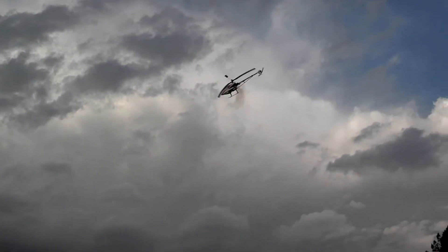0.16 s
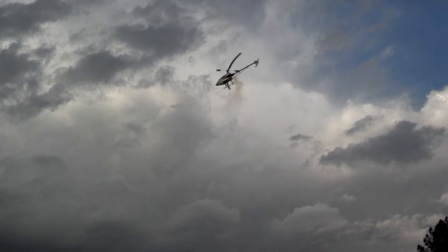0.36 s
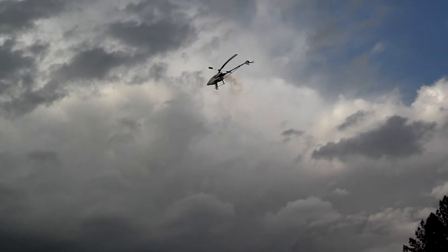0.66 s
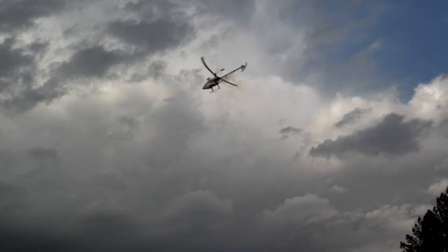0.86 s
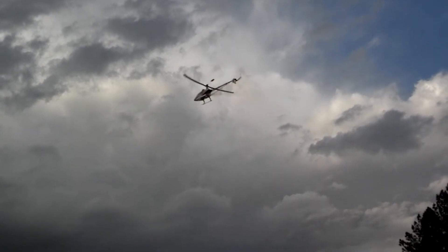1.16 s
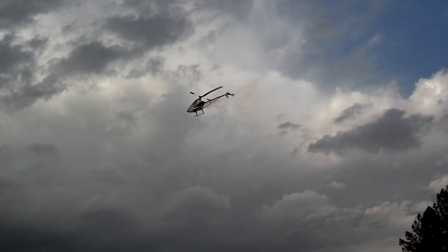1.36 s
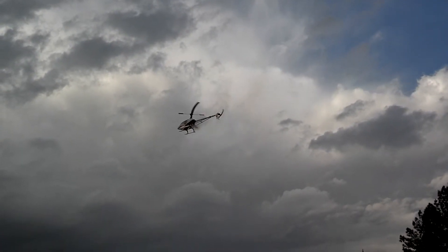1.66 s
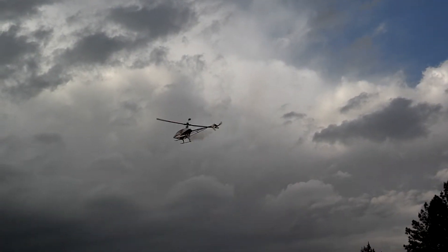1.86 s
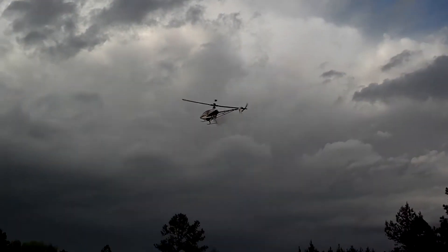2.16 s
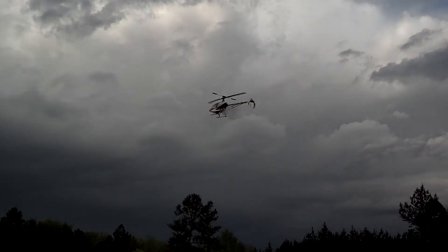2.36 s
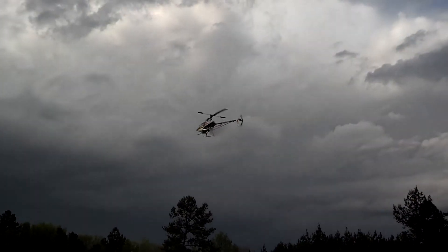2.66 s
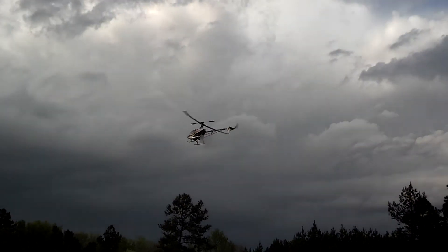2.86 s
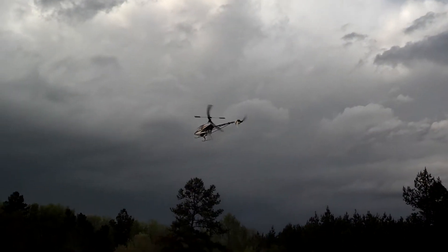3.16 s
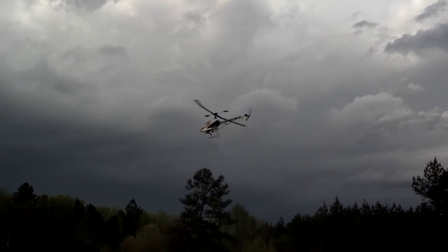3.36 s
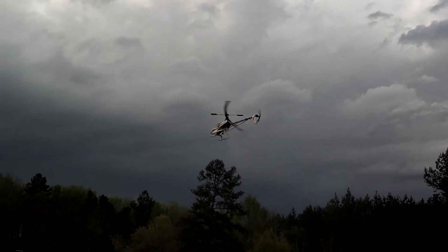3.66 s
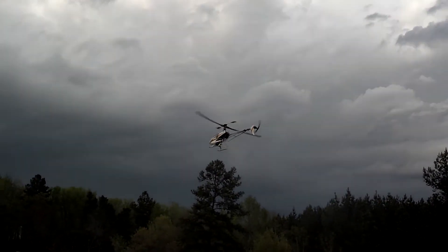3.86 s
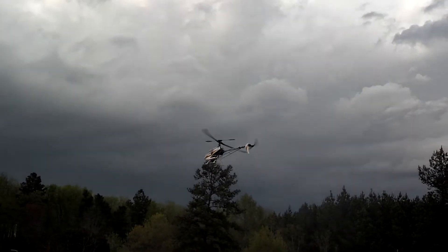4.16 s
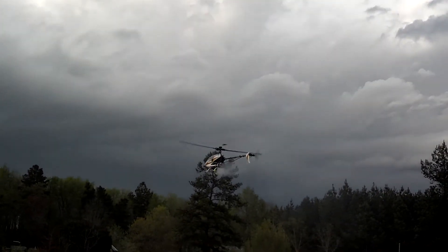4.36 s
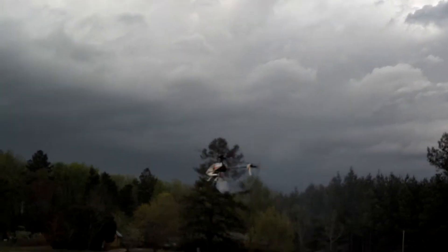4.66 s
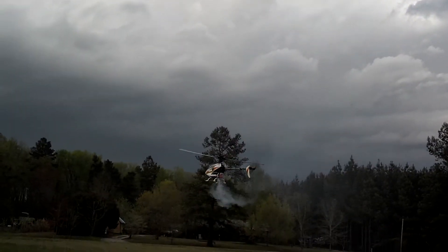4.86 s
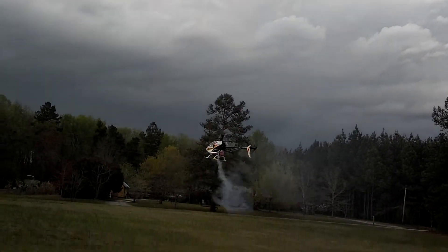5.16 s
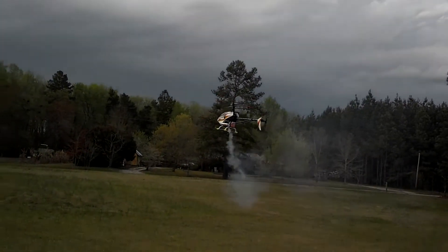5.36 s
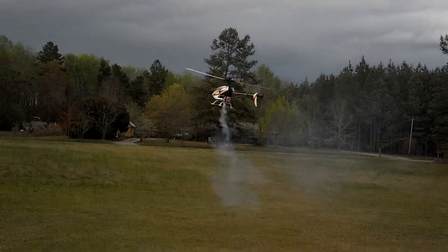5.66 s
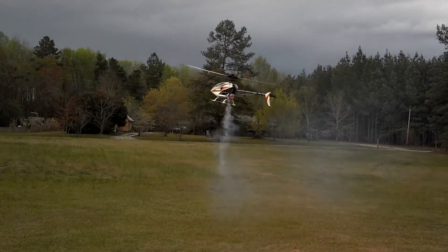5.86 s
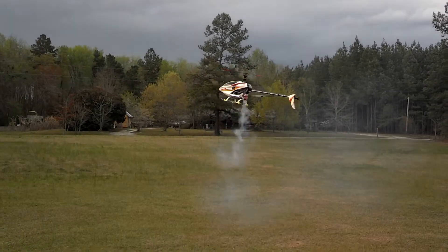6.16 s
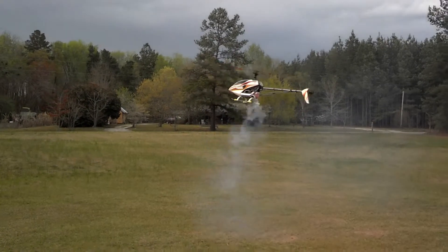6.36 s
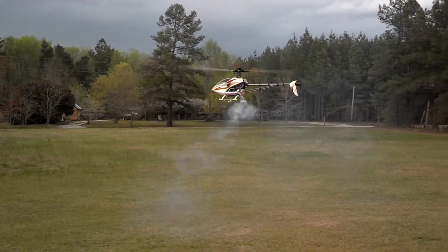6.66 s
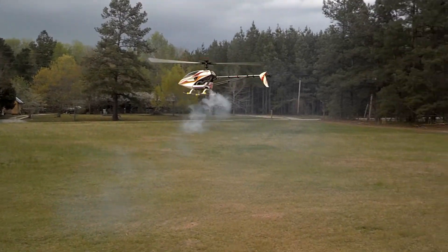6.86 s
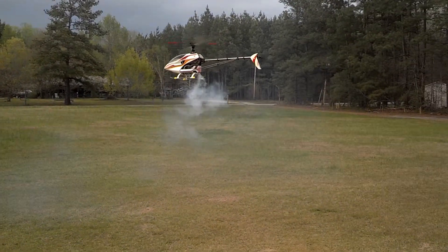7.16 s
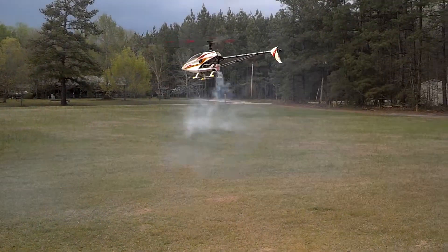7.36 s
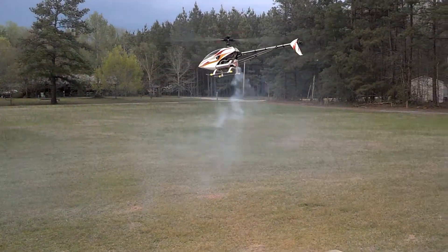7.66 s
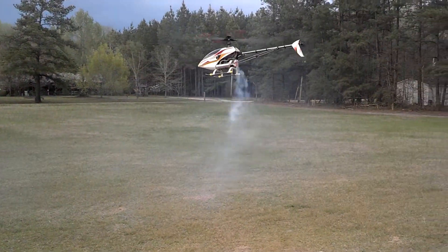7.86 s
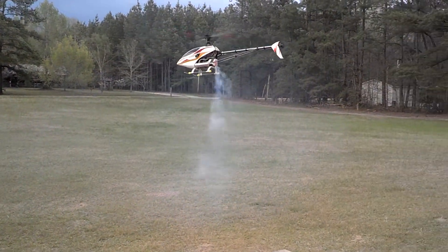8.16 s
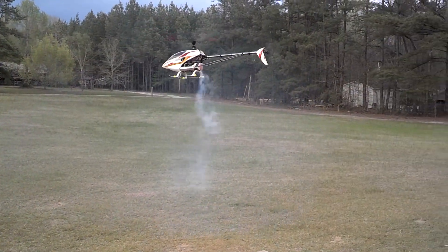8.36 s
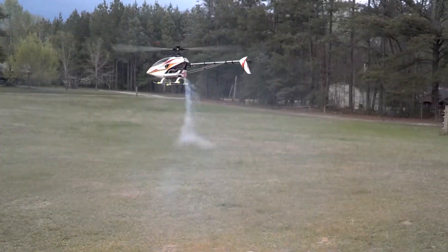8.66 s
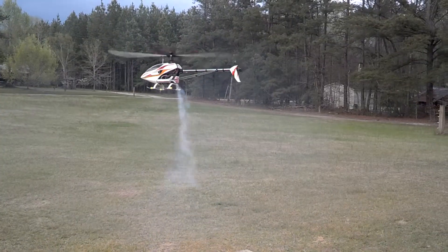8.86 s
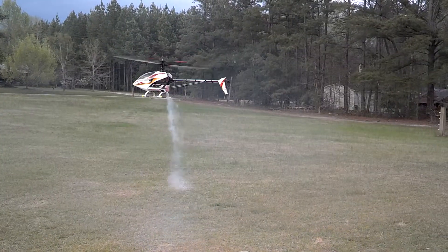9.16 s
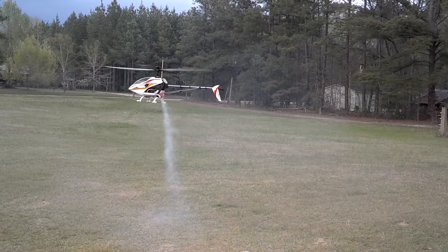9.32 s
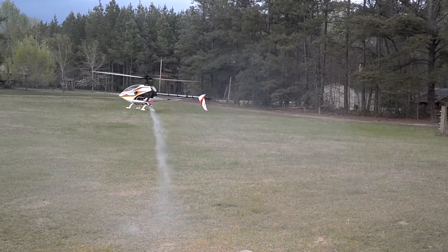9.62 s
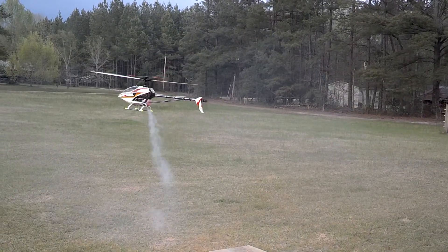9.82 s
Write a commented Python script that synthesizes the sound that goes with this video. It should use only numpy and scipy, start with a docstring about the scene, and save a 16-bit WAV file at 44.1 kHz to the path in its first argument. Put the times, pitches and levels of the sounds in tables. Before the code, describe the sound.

A glow-engine model helicopter buzzes steadily with a raspy, nasal whine and hissing exhaust, stumbling briefly early on, then hovering over an open field.

```python
"""A glow-engine model helicopter starts overhead, its engine stumbling three times in the first seconds.
It sinks to a hover above grass, turning side-on; the ground echo arrives sooner, so a comb sweeps bass and middle.
Exhaust partials, cracks, puffed hiss, gear tones and blade wash all follow one shaft, as a governor hunts in speed.
From five seconds in, soft buffets of breeze come and go; near the end the machine sinks again.
Faint scatter from trees lies behind it all, and a stereo widener spreads the picture."""
import sys
import numpy as np
from scipy import signal
from scipy.fft import rfft, irfft
from scipy.io import wavfile
from scipy.ndimage import uniform_filter1d

SR = 44100
rng = np.random.default_rng(int(sys.argv[2]) if len(sys.argv) > 2 else 0)


def dump_mix(stems):
    """Bounce the given channels to the path in sys.argv[1] as a 16-bit WAV at rate SR."""
    frames = np.atleast_2d(stems).T  # one column per channel
    limited = np.clip(frames, -1, 1)  # hard clip at full scale
    pcm = np.round(limited * 32767).astype(np.int16)
    wavfile.write(sys.argv[1], SR, pcm)


N = 440550
TIME = np.arange(N) / SR  # seconds
FREQ = np.fft.rfftfreq(N, 1 / SR)  # Hz

# In the tables, under, front and side are the parts of the machine that face the listener.
# Engine speed, as the governor hunts round its set speed: time_s, firings_per_s
FIRING_RATE = [(0.0, 103.58), (0.09, 102.91), (0.18, 103.53), (0.26, 102.93), (0.39, 103.69), (0.5, 102.81),
               (0.66, 104.11), (0.83, 103.19), (0.9, 103.65), (1.08, 103.36), (1.32, 104.17),
               (1.47, 103.53), (1.68, 104.47), (1.79, 103.58), (2.01, 104.56), (2.32, 103.5), (2.5, 104.31),
               (2.68, 103.58), (2.83, 104.2), (3.03, 103.26), (3.17, 103.99), (3.31, 102.98),
               (3.49, 103.46), (3.61, 102.91), (3.71, 104.0), (3.84, 103.43), (4.02, 103.7), (4.11, 102.97),
               (4.24, 103.76), (4.34, 103.21), (4.54, 104.28), (4.67, 103.24), (4.92, 104.63),
               (5.09, 103.04), (5.21, 104.39), (5.47, 103.36), (5.73, 104.47), (5.94, 103.73),
               (6.03, 104.25), (6.12, 103.99), (6.2, 104.49), (6.39, 103.47), (6.58, 104.37),
               (6.76, 103.41), (7.0, 104.36), (7.21, 103.42), (7.31, 104.63), (7.64, 103.21),
               (7.78, 104.31), (8.02, 102.6), (8.15, 103.97), (8.32, 103.0), (8.45, 104.37), (8.62, 103.53),
               (8.7, 103.83), (8.79, 102.9), (8.91, 104.0), (9.12, 102.67), (9.32, 103.97), (9.52, 102.63),
               (9.62, 103.59), (9.72, 103.04), (9.84, 103.72), (9.92, 103.04), (9.98, 103.4)]
# The engine stumbles and carries on firing on the other turn: time_s
STUMBLES = [0.58, 1.46, 2.1]
# Delay of the ground echo, before any turf shift: time_s, lag_ms
GROUND_LAG = [(0, 5.8), (.55, 5.92), (1.2, 5.7), (1.6, 5.25), (2.1, 4.75), (2.5, 4.35), (3.1, 4.02),
              (3.9, 3.78), (4.3, 3.45), (5, 2.72), (5.4, 2.58), (6.5, 2.5), (7.6, 2.6), (8.4, 2.52),
              (9.2, 2.3), (9.99, 1.85)]
# Turn of the machine, 0 = under, 1 = front quarter, 2 = side: time_s, aspect
ASPECT = [(1.1, 0), (1.6, .45), (2.1, 1), (5.8, 1), (6.4, 1.75), (6.8, 2)]
# Exhaust harmonics, balanced before buzz and ring are levelled: firing_multiple, under_db, front_db, side_db
EXHAUST = [(1, -65.0, -57.0, -57.0), (2, -39.5, -39.5, -36), (3, -49.5, -50.0, -49.0),
           (4, -50.0, -46.5, -50.0), (5, -50.0, -58.0, -58.5), (6, -44.5, -42.5, -38.5),
           (7, -45.5, -45.5, -47.5), (8, -47.0, -40.0, -42.5), (9, -54.0, -50.5, -46.0),
           (10, -34.0, -40.0, -41.5), (11, -43.0, -37.5, -39.5), (12, -41.0, -36.5, -38.5),
           (13, -35.5, -37.0, -37.0), (14, -42.5, -37.0, -36.0), (15, -36.0, -32.0, -36.5),
           (16, -44.0, -32.0, -35.0), (17, -46.0, -40.0, -49.5), (18, -30.5, -40.0, -38.0),
           (19, -42.5, -45.5, -43.0), (20, -36.5, -44.0, -32.0), (21, -52.5, -45.5, -47.5),
           (22, -45.5, -43.5, -41.0), (23, -53.5, -49.0, -49.5), (24, -47.5, -46.5, -42.5),
           (25, -56.5, -47.5, -50.0), (26, -60.0, -49.5, -49.0), (27, -51.5, -52.0, -49.0),
           (28, -61.5, -59.5, -55.5), (29, -56.5, -49.5, -58.5), (30, -59.0, -52.5, -60.5),
           (31, -60.0, -56.0, -51.0), (32, -60.0, -63.0, -61.0), (33, -63.0, -52.5, -49.5),
           (34, -52.0, -59.5, -48.5), (35, -50.5, -51.0, -45.5), (36, -55.5, -45.0, -51.0),
           (37, -56.0, -54.0, -51.0), (38, -52.0, -55.0, -54.0)]
# Phase scatter of the exhaust pulse, cleanest ahead of the muffler: under_rad, front_rad, side_rad
PHASE_SCATTER = (1.35, 0.9, 1.6)
# Muffler buzz, before the governor's surges: time_s, level_db
BUZZ_LEVEL = [(0.0, -33.5), (0.89, -33.5), (2.37, -29.5), (2.66, -27.5), (2.88, -32.5), (4.0, -27.5),
              (4.38, -32.5), (4.83, -28), (5.04, -30.5), (5.7, -25.5), (6.16, -30.5), (6.41, -26.5),
              (7.11, -31.5), (7.36, -28), (7.53, -32.5), (8.66, -29), (9.24, -37), (9.99, -29)]
# The pipe's higher ring, before its trim and the surges: time_s, level_db
RING_LEVEL = [(0.0, -25), (0.67, -25), (1.21, -34), (1.5, -27), (2.17, -30), (4.59, -32), (5.78, -30),
              (6.37, -28), (7.45, -32.5), (8.61, -29.5), (9.03, -36), (9.99, -25.5)]
# Sharp edge of each exhaust pulse, a filter gain: pitch_hz, under_db, front_db, side_db
CRACK_COLOUR = [(3340, -55, -50, -43), (4320, -30, -31, -7), (4570, -25, -9.5, -23), (6760, -24, -56, -23),
                (12000, -36, -39, -40)]
# Rotor hum and gear whine, before a shared gain: rotor_speed_multiple, under_db, front_db, side_db
DRIVE_TONES = [(6.03, -63, -61, -62), (6.91, -62.5, -59.5, -58), (7.94, -58, -60, -62),
               (10.993, -44.5, -47, -47), (12.91, -71, -60, -56), (78.7, -69, -48.5, -56),
               (79.8, -68, -53, -52), (83.6, -70, -51, -39), (85.2, -47, -58, -37.5), (88.7, -46, -48, -42)]
# Hiss with rattle, before the surges: time_s, level_db
HISS_LEVEL = [(0, -31), (.95, -32.5), (1.1, -34), (1.3, -31.5), (1.7, -31.5), (2.4, -31), (2.75, -31),
              (2.95, -31.5), (4.15, -31), (4.35, -33.5), (4.75, -32), (4.93, -31.5), (5.1, -31.5),
              (5.9, -31), (6.1, -30.5), (6.6, -30), (7.6, -31), (8.5, -29), (8.95, -29.5), (9.2, -32),
              (9.4, -31), (9.99, -29)]
# Relative spectrum of the hiss: pitch_hz, under_db, front_db, side_db
HISS_COLOUR = [(100, -50, -50, -50), (1500, -20, -20, -20), (2300, 2, 2, 3), (2800, 2, 0, 1),
               (3300, 0, -1, 0), (3650, 3, 1, 2), (4300, 3, -1, 0), (5250, -1, -5, -3), (5600, 2, -2, 1),
               (6050, 3, 1, -1), (6450, 1, -1, 0), (6850, -4, -5, 0), (7500, -1, -1, -1),
               (8300, -11, -3, -6), (8900, -3, -4, -2), (9900, -4, -2, -2), (10650, -1, 0, 1),
               (11350, -4, -1, -1), (12650, -1, -1, -2), (14300, 3, 1, 2), (15600, -1, 0, 1),
               (16300, -10, -10, -10)]
# Metal parts rung by each firing, balanced against the gas: pitch_hz, width_hz, under_db, front_db, side_db
RATTLE_PARTS = [(6610, 100, -51, -11.5, -51), (6740, 580, -24, -55, -7.5), (9700, 750, -19, -13, -38),
                (11160, 83, -44, -12, -10), (11750, 430, -10, -57, -9), (15000, 650, -12, -16, -8)]
# Relative spectrum of the blade wash: pitch_hz, under_db, front_db, side_db
WASH_COLOUR = [(30, -37, -33, -39), (75, -21.5, -26, -20.5), (130, -4, -14, -20), (200, -10, -8.5, -6),
               (320, 0, -2.5, -6), (523, 0, -1.5, 0.5), (840, -3, 0, -1.5), (1053, 7.5, 3, 4),
               (1550, 4.5, 5, 3.5), (1950, 8.5, 3.5, 9), (2340, -10.5, 0.5, -1.5), (2430, -40, 6, -46),
               (3220, -25, -4, -22), (6000, -36, -44, -29)]
# Level of the blade wash: under_db, front_db, side_db
WASH_LEVEL = (-30.5, -32, -33)
# Breeze on the second port: centre_s, length_s, level_db
BUFFETS = [(5.09, .04, -52), (6.61, .065, -45), (6.66, .04, -45), (6.72, .05, -48), (7.794, .06, -51),
           (8.1, .035, -48)]
# Bands the stereo widener keeps out of the mid: centre_hz, half_width_hz
MID_GAPS = [(2870, 617), (5600, 460), (8200, 414), (11100, 580), (13780, 380)]
# Bands it keeps out of the side signal: centre_hz, half_width_hz
SIDE_GAPS = [(1150, 820), (4330, 700), (7100, 303), (9700, 600), (12550, 650), (15250, 250)]
# Stereo width, before the gaps: pitch_hz, side_against_mid_db
SPREAD = [(50, -3), (110, 2.5), (220, -7), (600, -9), (1300, 4.5), (1900, 4), (2600, 7), (16000, -1)]
# Stereo lean: pitch_hz, left_minus_right_db
BALANCE = [(40, -1), (120, -5), (220, -3.5), (400, 1), (1450, 0), (1700, -2), (2000, -8), (2250, -4),
           (2450, 0), (16000, 0)]

FIRINGS_PER_ROTOR_TURN = 9 / 2
JITTER_FIRINGS_PER_S, JITTER_CHANGES_PER_S = .08, 20  # uneven burning shakes the speed
SPIT_LENGTH, SPIT_FLOOR = .08, 1.05  # decay of each spit (share of a cycle), over a steady part
TREES_DB, TREES_T60_S, TREES_BAND_HZ = -23, .7, (500, 3000)
BAND_EDGE_HZ = 15930


def exhaust(cycles, sides, ring_trim_db=-5.0):
    """Firing harmonics: crank drone and octave, low orders, muffler buzz, pipe ring and rasp.

    The grass reflects bass strongly, so at hover height the echo largely cancels the drone."""
    # Half a cycle's slip turns the odd harmonics over at each stumble.
    flip = uniform_filter1d(np.cos(np.pi * np.searchsorted(STUMBLES, TIME)), size=1200)
    scatter = np.array(PHASE_SCATTER) @ sides
    partials = {}
    for k, *db in EXHAUST:
        partial = harmonic(cycles, k, facing_db(db, sides), scatter)
        partials[k] = partial * flip if k % 2 else partial

    low = sum(partials[k] for k in (1, 3, 5, 6, 7, 8, 9))
    buzz = sum(partials[k] for k in range(10, 17))
    ring = sum(partials[k] for k in range(17, 23))
    rasp = sum(partials[k] for k in range(23, 39))

    # The crank turns twice a firing, so its drone is harmonic 2.
    drone = ground(partials[2], bounce=0.8, turf_ms=-0.2)
    octave = ground(partials[4], bounce=0.4, turf_ms=0.25)
    muffler = at_level(ground(buzz, bounce=0.45), BUZZ_LEVEL, surge_db=1.0)
    pipe = amp(ring_trim_db) * at_level(ground(ring), RING_LEVEL, surge_db=1.0)
    return drone + octave + muffler + pipe + ground(low, bounce=0.39) + rasp


def harmonic(cycles, k, db, scatter, flutter_db=0.7):
    """One exhaust partial, nearly in step with the others; turbulent air makes it flutter."""
    phase = 2 * np.pi * k * cycles + scatter * rng.standard_normal()
    return amp(db + flutter_db * wander(9)) * np.cos(phase.astype(np.float32))


def crack(firings, sides):
    """The exhaust port snaps open at each firing: a sharp tick above the rasp."""
    return coloured(clicks(firings), CRACK_COLOUR, sides)


def hiss(firings, rotor, sides, flicker_db=0.82):
    """Gas spits out at each firing, with the rattle; blades chop both, and the grass returns none of it."""
    spits = puffs(firings, SPIT_LENGTH, SPIT_FLOOR, uneven_db=2)
    gas = coloured(spits * air_noise(alike=0.17), HISS_COLOUR, sides)
    chop = 1 + .13 * np.cos(2 * np.pi * 2 * rotor)  # two blades
    beat = chop * amp(flicker_db * wander(40))
    return at_level(beat * (gas + rattle(firings, sides)), HISS_LEVEL, surge_db=0.65)


def rattle(firings, sides, slop=.004, lag=.07):
    """Each firing knocks the metal parts a moment later (slop and lag in cycles); a short chatter follows."""
    out = np.zeros(N)
    cycle = firings + slop * wander(60) + 1 - lag  # the 1 keeps the count positive
    knocks = 9 * clicks(cycle)
    for hz, width, *db in RATTLE_PARTS:
        chatter = puffs(cycle, length=0.28, floor=0.21, uneven_db=1.5) * rng.standard_normal(N)
        ring = signal.lfilter(*signal.iirpeak(hz, hz / width, fs=SR), knocks + chatter)
        out += amp(facing_db(db, sides)) * ring / ring.std()
    return out


def drivetrain(rotor, sides, gain_db=2, flutter_db=1):
    """Rotor hum and gear whine, locked to the engine by the gears."""
    tones = np.zeros(N)
    for multiple, *db in DRIVE_TONES:
        level = amp(facing_db(db, sides) + flutter_db * wander(8.2))
        tones += level * np.sin(2 * np.pi * multiple * rotor)
    return amp(gain_db) * ground(tones, bounce=0.66)


def wash(firings, rotor, sides, chop=0.075):
    """Air churned by the two blades, mixed with the rough part of the exhaust."""
    blades = 1 + chop * np.cos(2 * np.pi * 2 * rotor)
    beat = blades * puffs(firings, length=0.35, floor=7.5, uneven_db=4.0)
    air = coloured(beat * air_noise(alike=0.87), WASH_COLOUR, sides)
    return amp(facing_db(WASH_LEVEL, sides)) * steadied(ground(air, bounce=0.23))


def ground(x, bounce=0.37, dull_hz=4500, turf_ms=0):
    """Adds the echo off the grass, which swallows the treble and shifts the timing of low tones."""
    soft = signal.lfilter(*signal.butter(1, dull_hz, fs=SR), x)
    then = TIME - (curve(GROUND_LAG) + turf_ms) / 1000
    echo = np.apply_along_axis(lambda port: np.interp(then, TIME, port, left=0), -1, soft)
    return x + bounce * echo


def treeline(x):
    """Faint, dull scatter from the trees round the field, different at each port; bass passes the trunks."""
    t = np.arange(SR) / SR
    sparse = rng.standard_normal((2, SR)) * (rng.random((2, SR)) < .05)
    taps = sparse * amp(-60 * t / TREES_T60_S) * (t > .02)
    tail = signal.lfilter(*signal.butter(2, TREES_BAND_HZ, "bandpass", fs=SR), taps)
    tail = tail / np.linalg.norm(tail[0])
    return amp(TREES_DB) * signal.fftconvolve(x, tail, axes=1)[:, :N]


def breeze(low_hz=70, high_hz=150):
    """Soft, low thumps of air on the second port: band-passed noise under bell-shaped swells."""
    band = signal.butter(4, [low_hz, high_hz], "bandpass", fs=SR, output="sos")
    air = signal.sosfilt(band, rng.standard_normal(N))
    swell = sum(amp(db) * np.exp(-(2 * (TIME - s) / length) ** 2) for s, length, db in BUFFETS)
    return np.outer([0, 1], swell * air / air.std())


def facing():
    """Weights of the three sides of the machine as it turns towards the listener."""
    aspect = np.clip(curve(ASPECT), 0, 2)
    return np.maximum(1 - abs(aspect - np.arange(3)[:, None]), 0)


def facing_db(db, sides):
    """Level in dB at every sample, glided between the three sides."""
    return np.array(db) @ sides


def coloured(x, table, sides):
    """Filters x by the spectrum that each side radiates."""
    hz, *columns = np.transpose(table)
    spectrum = rfft(x.astype(np.float32))
    out = 0
    for weight, db in zip(sides, columns):
        out = out + weight * irfft(spectrum * amp(read(hz, db)).astype(np.float32), N)
    return out


def puffs(cycles, length, floor, uneven_db):
    """Envelope of one puff of gas a firing, of random strength; length is a share of a cycle."""
    strength = amp(uneven_db * rng.standard_normal(2048))[cycles.astype(int)]
    return floor + strength * np.exp(-((cycles % 1) / length))


def clicks(cycles):
    """One unit click at each firing."""
    return np.diff(np.floor(cycles), prepend=np.floor(cycles[0]))


def air_noise(alike):
    """White noise at two ports, partly shared."""
    first, other = rng.standard_normal((2, N))
    return np.array([first, alike * first + np.sqrt(1 - alike ** 2) * other])


def hunt():
    """The governor's overshoot: firings a second above the running mean speed."""
    speed = curve(FIRING_RATE)
    return speed - uniform_filter1d(speed, size=SR // 2)


def at_level(x, rows, surge_db):
    """Brings x onto a slow dB curve, swelling surge_db for each firing a second of overshoot."""
    return steadied(x) * amp(curve(rows) + surge_db * hunt())


def steadied(x):
    """Holds the running level of x near one, over about an eighth of a second."""
    size = SR // 8
    power = uniform_filter1d(uniform_filter1d(x * x, size), size)
    return x / np.sqrt(np.abs(power) + 1e-14)


def wander(rate):
    """Smooth chance of unit size, changing about rate times a second."""
    knots = rng.standard_normal(4096)
    fine = signal.resample(knots, len(knots) * 4)
    return np.interp(TIME * rate * 4, np.arange(len(fine)), fine)


def amp(db):
    """Decibels to gain."""
    return 10 ** (np.asarray(db) / 20)


def curve(rows):
    """A control curve at every sample."""
    return np.interp(TIME, *np.transpose(rows))


def read(hz, values):
    """A spectrum at every frequency bin, joined along log frequency."""
    return np.interp(np.log(FREQ + 1), np.log(np.asarray(hz) + 1), values)


def notches(gaps, order=4):
    """Gain of a row of deep, flat-bottomed notches."""
    steep = [((FREQ - hz) / width) ** order for hz, width in gaps]
    return np.prod([u / np.sqrt(1 + u * u) for u in steep], axis=0)


def scene(gust_db=0.5, gusts_per_s=8):
    """One governed shaft drives everything; gusts on the way make the whole machine waver."""
    speed = curve(FIRING_RATE) + JITTER_FIRINGS_PER_S * wander(JITTER_CHANGES_PER_S)
    cycles = np.cumsum(speed) / SR  # one cycle is two turns of the crank
    firings = cycles + np.searchsorted(STUMBLES, TIME) / 2  # each stumble slips half a cycle
    rotor = cycles / FIRINGS_PER_ROTOR_TURN
    sides = facing()
    machine = exhaust(cycles, sides) + crack(firings, sides) + hiss(firings, rotor, sides)
    machine = machine + drivetrain(rotor, sides) + wash(firings, rotor, sides)
    heard = machine * amp(gust_db * wander(gusts_per_s))
    return heard + treeline(heard) + breeze()


def record(dry, leak_db=-52):
    """A stereo widener deals the treble of the two ports to mid and side in alternate bands; then a low-pass."""
    first, second = rfft(dry)
    to_mid = notches(MID_GAPS) + amp(leak_db)
    to_side = (notches(SIDE_GAPS) + amp(leak_db)) * amp(read(*np.transpose(SPREAD)))
    power = np.hypot(to_mid, to_side)  # what one channel loses, the other gains
    mid = first * to_mid / power
    side = -1j * second * to_side / power  # a quarter cycle behind
    lean = amp(read(*np.transpose(BALANCE)))
    pair = np.array([(mid + side) * lean, mid - side]) * np.sqrt(2 / (1 + lean ** 2))
    low_pass = signal.firwin(801, BAND_EDGE_HZ, window=("kaiser", 9), fs=SR)
    return signal.oaconvolve(irfft(pair, N), low_pass[None], "same")


dry = scene()
out = record(dry)
dump_mix(out)
```